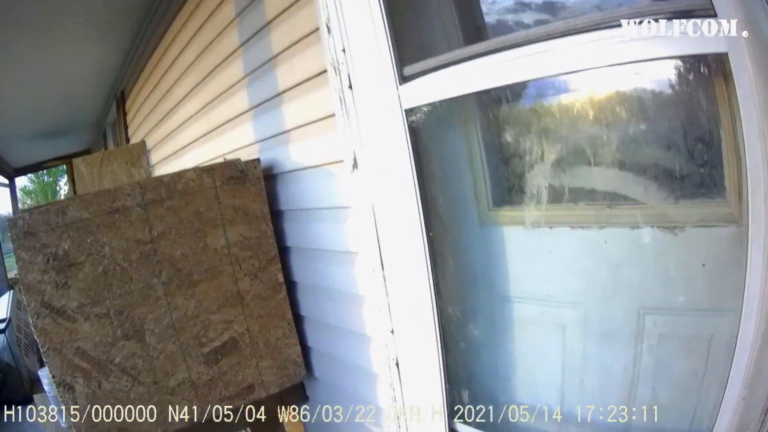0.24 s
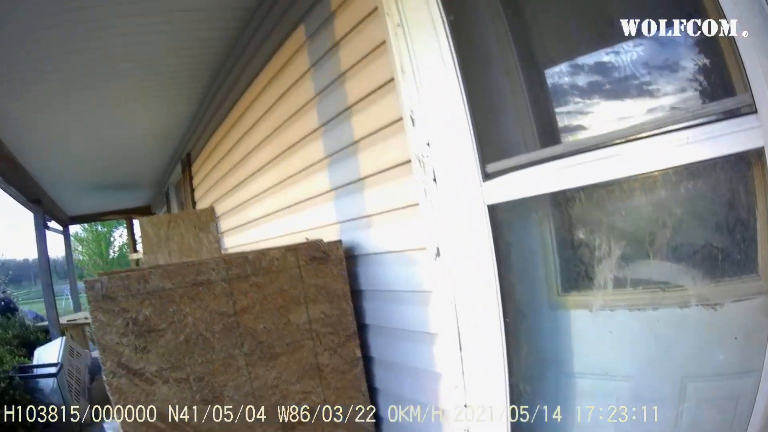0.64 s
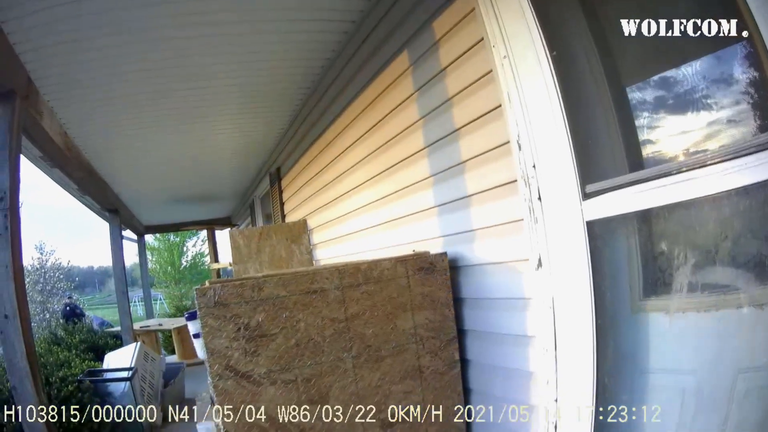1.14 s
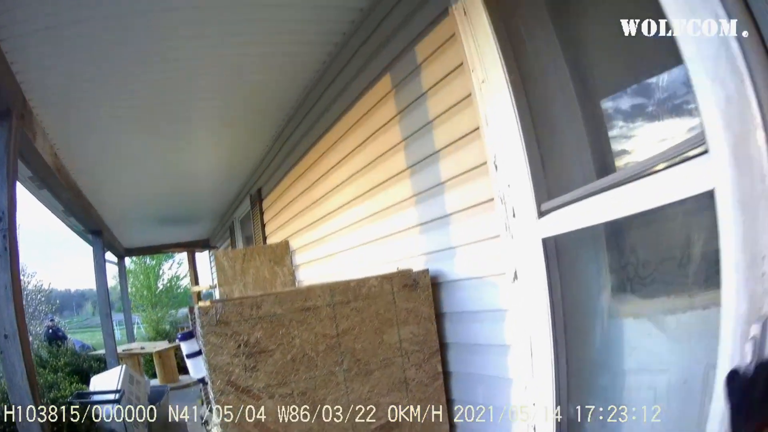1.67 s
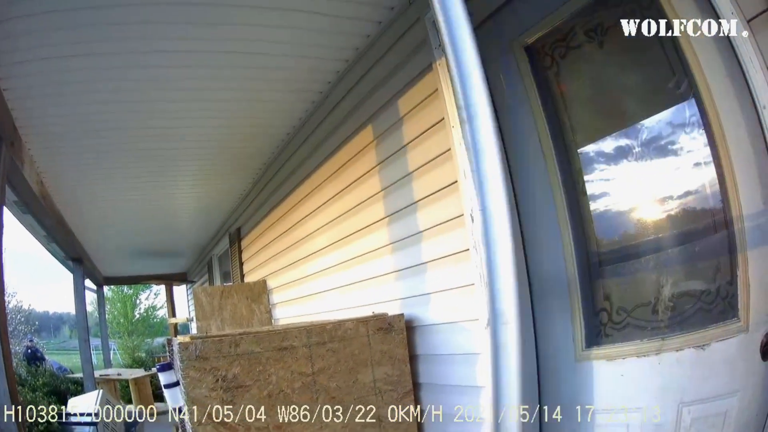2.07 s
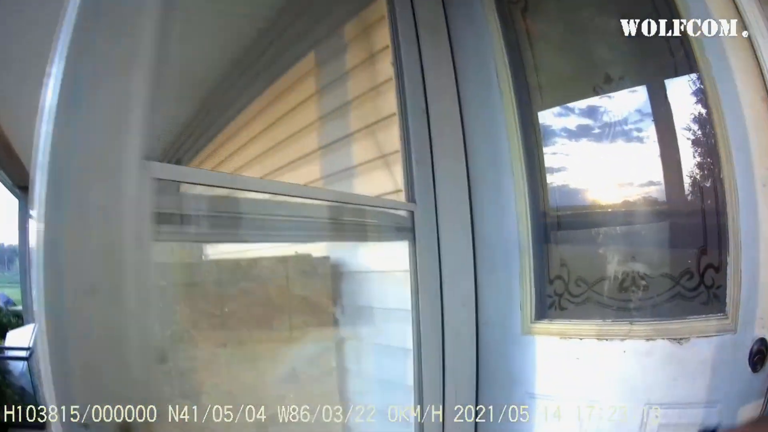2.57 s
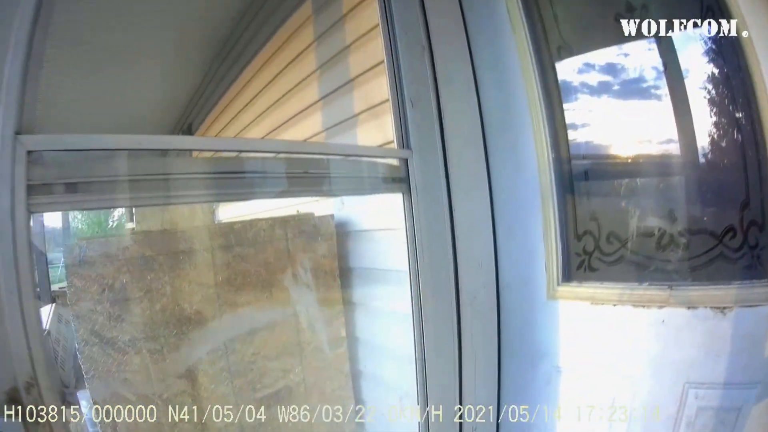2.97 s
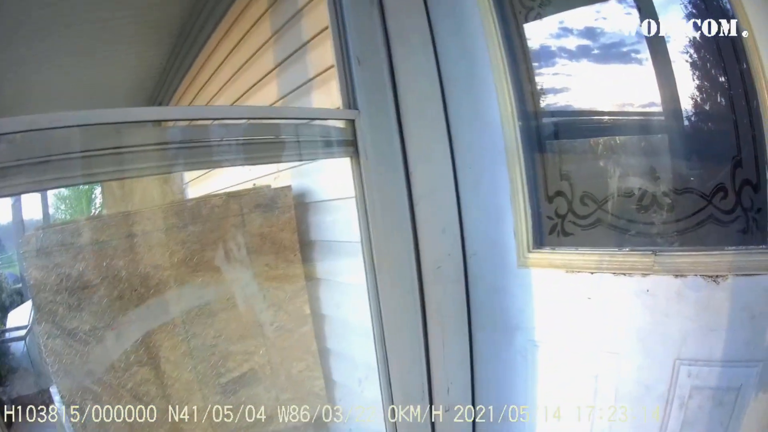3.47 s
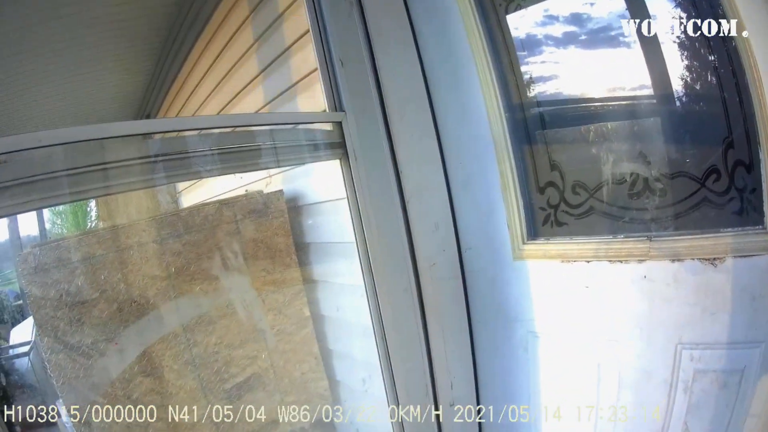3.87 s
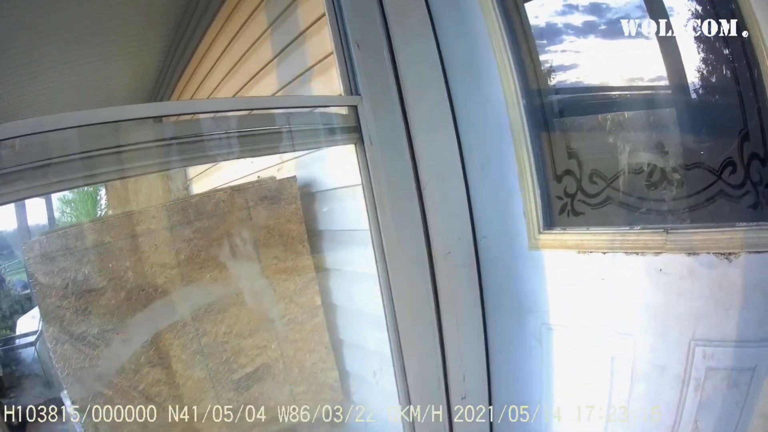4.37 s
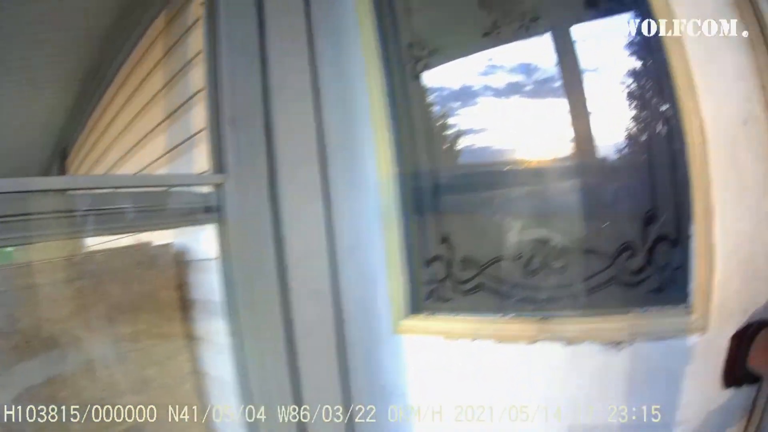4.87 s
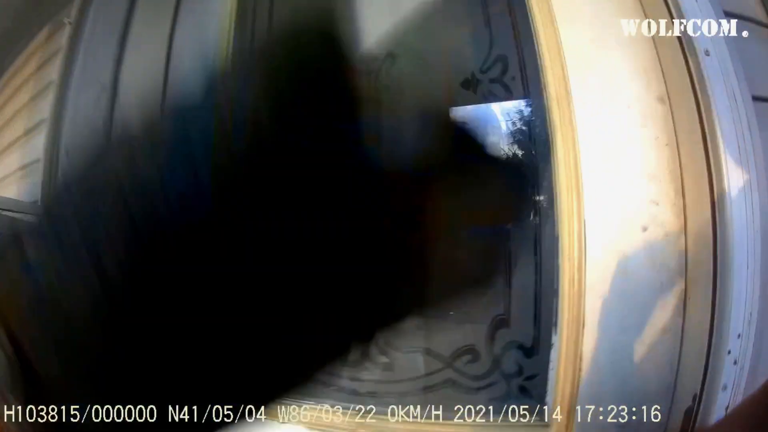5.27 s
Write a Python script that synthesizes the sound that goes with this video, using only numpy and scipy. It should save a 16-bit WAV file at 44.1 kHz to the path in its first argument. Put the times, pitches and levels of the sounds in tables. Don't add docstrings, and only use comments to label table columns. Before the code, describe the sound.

On a quiet covered porch, a hard sharp hit rings a thin door frame and loose glass, then dies within half a second. Sharp clicks, metal pings and sliding scrapes mark the latch and the door swinging open. It calms to faint contacts and soft outdoor wash, a bird chirping now and then, before low bumps and fabric rustle close the clip. The slightly clipped, thinned sound comes from a body-worn camera.

```python
import sys
import numpy as np
from scipy import signal
from scipy.fft import rfft, irfft, next_fast_len
from scipy.io import wavfile
from scipy.ndimage import uniform_filter1d, map_coordinates

SR = 44100
rng = np.random.default_rng(int(sys.argv[2]) if len(sys.argv) > 2 else 0)


def elevation(decibels):
    levels = np.asarray(decibels, float)
    return 10 ** (levels / 20)


def unload_wav(signal):
    wavfile.write(
        sys.argv[1],
        SR,
        np.round(np.clip(np.atleast_2d(signal).T, -1, 1) * 32767).astype(np.int16),
    )


N = 243873

# [f/Hz, density/dB per Hz]
HISS_SPECTRUM = [(1470, -54), (2500, -19.5), (4110, -6.5), (5280, -4.5), (6300, -1.5), (8040, -8),
                 (10100, -12.5), (11900, -17.5), (14100, -28), (15500, -40)]
# [f/Hz, density/dB per Hz]
SCRAPE_SPECTRUM = [(410, -22), (700, -8.5), (2110, -6.5), (2300, -10), (2860, -10), (3800, -13.5),
                   (4940, -33), (8360, -120)]
# [f/Hz, density/dB per Hz]
BODY_SPECTRUM = [(59, -33), (100, -2.5), (227, -2.5), (272, -2.5), (400, -4.5), (594, -6.5), (1000, -17.5),
                 (1300, -45), (2200, -120)]
# [t/s, level/dB]
BREEZE_LEVEL = [(0, 1.5), (2.5, -0.5), (2.7, -4), (3.7, -1.5), (4.1, 0), (5.53, -0.5)]


def unit(x):
    return x / np.sqrt(np.mean(x ** 2) + 1e-20)


def along(points, hz):
    f, v = np.transpose(points)
    return np.interp(np.log(hz + 1), np.log(f + 1), v)


def curves(rows):
    s, *cols = np.transpose(rows)
    return [np.interp(np.arange(N) / SR, s, c) for c in cols]


def wobble(rate_hz):
    knots = rng.standard_normal(int(N * rate_hz / SR) + 4)
    return map_coordinates(knots, [np.arange(N) * rate_hz / SR])


def filtered(x, response):
    m = next_fast_len(N + SR // 2)
    return irfft(rfft(x, m) * response(np.fft.rfftfreq(m, 1 / SR)), m)[..., :N]


def resonance(modes):
    def response(f):
        total = 0
        for k, (centre, width, db) in enumerate(modes):
            damping = 1j * f * width
            total = total + (-1) ** k * elevation(db) * damping / (centre * centre - f * f + damping + 1)
        return total
    return response


def rush(spectrum, grain_db, patchy_db=0.):
    rough = rng.standard_normal(N) * elevation(grain_db * wobble(350) + 0.41 * grain_db * wobble(45))
    z = signal.stft(rough, nperseg=512)[2]
    field = uniform_filter1d(rng.standard_normal(z.shape), size=3, axis=0)
    field = uniform_filter1d(field, size=5, axis=1)
    rough = signal.istft(z * elevation(patchy_db * unit(field)), nperseg=512)[1][:N]
    return unit(filtered(rough, lambda hz: elevation(along(spectrum, hz))))


def echoes(x, t60s, delay_s):
    hz, t, z = signal.stft(rng.standard_normal(SR // 2), SR, nperseg=256)
    tail = signal.istft(z * elevation(-60 * t / along(t60s, hz)[:, None]), SR, nperseg=256)[1]
    delayed = np.pad(x, (round(delay_s * SR), 0))
    return signal.fftconvolve(delayed, tail / np.linalg.norm(tail))[:N]


def surroundings():
    # [t/s, f/Hz, level/dB]
    hum_track = [
        (0, 638, -59),
        (2.6, 630, -62),
        (3.4, 562, -60.5),
        (5.53, 571.6, -62),
    ]
    # [f/Hz, density/dB per Hz]
    air_spectrum = [(59, -31), (100, -17.5), (404, -19), (468, -2), (629, -16.5), (761, -25.5), (1020, -8),
                    (2140, -16.5), (2290, -35), (3640, -46), (4220, -41), (5790, -16), (15600, -19)]
    # [t/s, level/dB]
    traffic_level = [(0, -24), (.06, -37.5), (.3, -51), (.71, -57), (.85, -49.5), (1.17, -55), (1.4, -51),
                     (1.66, -61), (1.8, -53.5), (2.45, -50.5), (2.55, -43), (2.66, -55), (3.1, -50.5),
                     (3.48, -53), (4.28, -46.5), (4.99, -44.5), (5.3, -48.5), (5.53, -44)]
    # [f/Hz, density/dB per Hz]
    rumble_spectrum = [(12, -33), (20, -20), (27, -8), (75, 0.5), (91, -1), (108, -16), (150, -10),
                       (200, -28.5), (330, -120)]
    hum_hz, hum_db = curves(hum_track)
    phase = 2 * np.pi * np.cumsum(hum_hz + 32 * wobble(150)) / SR
    hum = np.sqrt(2) * np.sin(phase) * elevation(hum_db + 2.5 * wobble(30))
    air = elevation(-62 + curves(BREEZE_LEVEL)[0]) * rush(air_spectrum, grain_db=0)
    traffic_db = curves(traffic_level)[0] + 1.2 * wobble(6.9)
    return air + elevation(traffic_db) * rush(rumble_spectrum, grain_db=2.0) + hum


def sparrow():
    # [t/s, time stretch, pitch factor, level/dB, second note's top f/Hz]
    chirp_rows = [
        (1.162, .95, .99, -34.5, 3980),
        (2.611, 1.0, .98, -38.5, 3950),
        (3.696, .92, 1.0, -35, 4000),
        (4.873, 1.0, .99, -42, 4500),
    ]
    # [lead-in/dB, arch top/dB, second note/dB, second note's pitch factor, falling end/dB]
    voicing = [
        (-20, -2, -4, 1.11, -1),
        (-20, 6, -4, 1.0, 5),
        (-3, -1, -6, 1.09, 5),
        (-4, 2, 7, 1.0, -6),
    ]
    # [t from start/s, f/Hz, level/dB]
    lead_in = [(-.035, 6100, -40), (-.025, 6050, -19), (-.008, 6000, -21), (-.005, 6000, -50)]
    # [t from start/s, f/Hz, level/dB]
    arch = [(-.003, 3800, -50), (.002, 4150, -2), (.007, 5200, -5), (.016, 5600, -5), (.022, 4600, -3),
            (.029, 3950, -2), (.035, 3700, -18)]
    # [t from start/s, f/Hz, level/dB]
    peaked = [(.046, 3300, -14), (.065, 3350, -17), (.082, 3650, -14), (.093, 4350, -2), (.097, 3800, -8),
              (.102, 3100, -7), (.112, 2900, -5), (.12, 2850, -14), (.127, 2800, -40)]
    # [delay/s, level/dB]
    perch_walls = [(.0031, -3), (.0078, -6), (.0133, -9), (.027, -12)]
    song = np.zeros(N)
    when, hz, db = np.transpose(lead_in + arch + peaked)
    quiver, flutter_db = 1 + 0.017 * wobble(500), 3.5 * wobble(350)
    lead, top, second = when < -.004, (hz > 5000) & (when > 0), when > .07
    peak = second & (hz > 3500)
    for chirp, voice in zip(chirp_rows, voicing):
        s, stretch, pitch, level_db, top_hz = chirp
        lead_db, top_db, second_db, lift, end_db = voice
        t = np.arange(N) / SR - s
        sung_hz = np.where(peak, np.minimum(hz * pitch * lift, top_hz), hz * pitch)
        sung_db = db + lead_db * lead + top_db * top + second_db * second + end_db * (when > .1)
        sung_db = sung_db + 60 * (lift - 1) * (peak & (hz < 4000))
        glide_hz = uniform_filter1d(np.interp(t, when * stretch, sung_hz), size=50) * quiver
        envelope_db = level_db + np.interp(t, when * stretch, sung_db, -120, -120) + flutter_db
        song += elevation(envelope_db) * np.sin(2 * np.pi * np.cumsum(glide_hz) / SR)
    return song + sum(elevation(db) * np.pad(song, (round(s * SR), 0))[:N] for s, db in perch_walls)


def strokes():
    # [peak t/s, rise/s, fall/s, hiss/dB, scrape rel/dB]
    stroke_rows = [(0.0, .05, 0.14, -21.5, 0), (.17, 0.096, 0.33, -43, -8), (.86, 0.33, 0.34, -36.5, -27),
                   (0.906, 0.16, 0.4, -30, -9), (1.2, 0.3, 0.42, -46.5, -3),
                   (1.311, 0.093, 0.061, -46.5, -2.5), (1.8, 0.3, 0.4, -51.5, 1.5),
                   (2.02, 0.43, 0.49, -42.5, -13), (2.4, 0.83, 0.92, -48, 0),
                   (2.66, 0.36, 0.26, -44.5, -26), (3.05, 0.22, 0.77, -45.5, -14.5),
                   (3.26, 0.26, 0.2, -40.5, -5), (3.35, 0.57, 0.5, -52, -44), (3.8, 0.27, 0.19, -45.5, -12),
                   (4.47, 0.23, 0.45, -50.5, -5), (4.79, 0.27, 1, -65, -1), (4.99, 1, 0.85, -50.5, -6),
                   (5.46, 0.37, 0.71, -36.5, -12)]
    s, rise, fall, db, scrape_db = np.transpose(stroke_rows)[:, :, None]
    t = np.arange(0, N, 64) / SR - s
    loss_db = 33 * np.where(t < 0, -t / np.abs(rise), t / np.abs(fall))
    shape = elevation(db - loss_db)

    def total(rel_db, rest_db):
        power = np.sum((shape * elevation(rel_db)) ** 2, axis=0) + elevation(rest_db) ** 2
        return np.repeat(10 * np.log10(power), 64)[:N]
    return total(0, -63), total(scrape_db, -67.5)


def cloth():
    hiss_db, scrape_db = strokes()
    body_db = -7.5 + curves(BREEZE_LEVEL)[0] + 0.74 * scrape_db
    shared_db = 1.0 * wobble(25)
    hiss = elevation(hiss_db + shared_db) * rush(HISS_SPECTRUM, grain_db=1.24, patchy_db=0.0)
    scrape = elevation(scrape_db + shared_db) * rush(SCRAPE_SPECTRUM, grain_db=0.7, patchy_db=2.5)
    return hiss + scrape + elevation(body_db + shared_db) * rush(BODY_SPECTRUM, grain_db=2.0)


def rubs():
    # [t/s, length/s, f/Hz, width/Hz, level/dB]
    rub_rows = [(0, .05, 310, 50, -32), (.98, 0.045, 720, 120, -35), (1.63, .12, 160, 32, -44.5),
                (2.931, 0.27, 1350, 260, -58), (2.98, 0.15, 2800, 150, -66), (3.0, 0.24, 5900, 270, -63),
                (3.2, 0.125, 790, 1000, -42), (4.107, .04, 340, 110, -46), (4.752, .06, 2100, 1800, -55),
                (5.247, 0.63, 128, 49, -45), (5.345, .15, 1250, 1500, -42), (5.29, .06, 6200, 500, -52),
                (5.425, .105, 6200, 780, -34)]
    t, out = np.arange(N) / SR, np.zeros(N)
    for s, length, hz, width, db in rub_rows:
        level = elevation(db + 2.5 * wobble(40))
        swell = np.sqrt(np.sin(np.pi * np.clip((t - s) / length, 0, 1)).clip(0))
        mode = resonance([(hz, width, 0)])
        out += level * swell * unit(filtered(rng.standard_normal(N), lambda f: mode(f) ** 2))
    return out


def decaying_tones(rows, attack_s):
    out, t = np.zeros(N + SR), np.arange(SR // 4) / SR
    for s, hz, db, t60 in rows:
        envelope = elevation(db - 60 * t / t60) * (1 - np.exp(-t / attack_s))
        out[round(s * SR):][:len(t)] += envelope * np.sin(2 * np.pi * hz * t)
    return out[:N]


def panel_thumps():
    # [t/s, f/Hz, peak/dB, t60/s]
    thump_rows = [(.001, 316.5, -13.5, 0.084), (.012, 163, -23, 0.22), (.022, 623, -21.5, 0.086),
                  (.004, 59.4, -19, 0.19), (.03, 115, -24, 0.11), (.06, 178, -25, .1), (.34, 50, -37, 0.21),
                  (.475, 150, -36, 0.16), (.742, 345, -34, 0.19), (.752, 167, -37, 0.21),
                  (.745, 628, -41.5, 0.18), (.831, 166, -29, 0.071), (0.834, 332, -32, .1),
                  (.848, 150, -37.5, 0.13), (.875, 304, -35, .2), (.905, 300, -32, 0.22),
                  (0.907, 433, -40, 0.09), (.985, 189, -30, 0.21), (1.655, 802, -37.5, 0.34),
                  (1.66, 645, -36, 0.27), (1.682, 368, -36.5, 0.21), (1.976, 240, -34.5, 0.093),
                  (1.86, 161, -37, 0.16), (2.043, 190, -32, 0.093), (2.185, 280, -36, .06),
                  (2.2, 563, -39, .08), (2.33, 900, -37, .06), (2.24, 522, -36.5, .3),
                  (2.285, 391, -30.5, .15), (2.288, 546, -35, 0.17), (2.37, 236, -31, 0.082),
                  (2.38, 415, -21.5, 0.045), (2.417, 420, -31, 0.14), (2.42, 863, -29, 0.06),
                  (2.47, 522, -29.5, 0.06), (2.565, 130, -37, 0.11), (3.229, 189, -31, 0.055),
                  (3.258, 162, -29, 0.071), (3.275, 930, -33.5, 0.097), (4.109, 403, -27.5, 0.079),
                  (4.111, 108, -28.5, 0.072), (4.13, 261, -34, .15), (4.216, 186, -31, 0.054),
                  (4.604, 980, -43.5, 0.071), (5.277, 444, -30.5, 0.037), (5.314, 134, -28.5, 0.098),
                  (5.452, 745, -26, 0.051), (5.475, 139, -19.5, 0.055), (5.517, 152, -25, .1)]
    return decaying_tones(thump_rows, attack_s=0.0024)


def metal_pings():
    # [t/s, f/Hz, peak/dB, t60/s]
    ping_rows = [(.0135, 8360, -4.5, 0.018), (.0245, 7470, -8, 0.016), (.6595, 5730, -27.5, 0.034),
                 (.665, 2530, -33.5, 0.065), (.754, 6250, -28, 0.033), (1.149, 6010, -30, .04),
                 (1.152, 2770, -28, 0.025), (1.9855, 4360, -29, 0.023), (1.9775, 1320, -37, 0.018),
                 (2.0868, 6430, -21.5, 0.0095), (2.1145, 1500, -29, 0.014), (2.1835, 1590, -39, 0.02),
                 (2.185, 4580, -37, .03), (2.3292, 4260, -22, .015), (2.3755, 4100, -29, 0.024),
                 (2.4153, 3700, -37, .03), (2.436, 6800, -33, 0.011), (2.457, 4060, -32.5, 0.036),
                 (2.497, 4240, -37, 0.019), (4.7545, 1610, -38, 0.018), (4.77, 3250, -49, .06),
                 (4.771, 1730, -43.5, 0.063), (5.172, 1000, -44.5, .03)]
    return decaying_tones(ping_rows, attack_s=0.00024)


def rattle(hiss, scrape, body):
    bright = hiss[:N] * rush(HISS_SPECTRUM, grain_db=2.5, patchy_db=3.5)
    middle = scrape[:N] * rush(SCRAPE_SPECTRUM, grain_db=1.24, patchy_db=2.5)
    return bright + middle + elevation(-2) * body[:N] * rush(BODY_SPECTRUM, grain_db=2.0, patchy_db=3.0)


def slides():
    # [t/s, peak/dB, scrape rel/dB, thud rel/dB, t60/s]
    slide_rows = [(0.079, -21, -30, -23, 0.076), (0.091, -4.5, -42, -20, 0.059),
                  (0.662, -26, -0.5, 0.5, 0.29), (0.738, -20, 1.5, 3, 0.16), (0.829, -19.5, -7, 2.5, 0.22),
                  (0.898, -17.5, 2.5, -2, 0.086), (1.1217, -21, -34, -13, 0.33),
                  (1.18, -33.5, 8.5, -23, 0.085), (1.6182, -20.5, -5.5, -6.5, 0.15),
                  (1.636, -16.5, -6.5, -17, 0.16), (1.6548, -8.5, -15, -21, 0.11),
                  (1.667, -17.5, -6, -3, 0.1), (1.7, -24.5, -1, 3, 0.18), (1.733, -18.5, 1, -14, 0.073),
                  (1.8538, -14.5, -5, -22.5, 0.14), (1.978, -20.5, -2.5, -7, 0.085),
                  (1.996, -24, -4.5, -2, 0.13), (2.041, -32, 9.5, 10.5, 0.1), (2.197, -26, -5, -5, 0.37),
                  (2.226, -25.5, -12, -4, 0.27), (2.246, -22, -6, -5, 0.15), (2.272, -27, 2, 0, 0.24),
                  (2.2907, -35.5, 6.5, 9, 0.17), (2.335, -35.5, 0, 0, 0.085), (2.38, -42, 6, 8, 0.13),
                  (2.42, -37, 8, 3, 0.067), (2.455, -28, 3.5, 10, 0.1), (3.24, -25, -12, -0.5, 0.33),
                  (3.83, -35, -7, -13, 0.35), (4.4134, -39, -1, -5, 0.1), (4.2375, -37.5, -7, 11, 0.17),
                  (4.5755, -38, -14, 9, 0.26), (5.33, -40, -9, 4, 0.85), (5.394, -29.5, -3, 6.5, 0.24),
                  (5.444, -27.5, -1, -2, 0.12)]
    t = np.arange(SR // 2) / SR
    hiss, scrape, body = np.zeros((3, N + SR))
    for s, db, scrape_db, thud_db, t60 in slide_rows:
        at = slice(round(s * SR), round(s * SR) + len(t))
        swell = (1 - np.exp(-t / (0.038 * t60))) ** 2
        fade = elevation(db - 10.5 - 60 * t / t60) * swell
        hiss[at] += fade
        scrape[at] += elevation(scrape_db) * fade
        body[at] += elevation(thud_db) * fade
    return rattle(hiss, scrape, body)


def contacts():
    # [t/s, peak/dB, thud rel/dB]
    pane_rows = [(0.0004, 2, -19.5), (0.0054, -12.5, -19), (0.0132, -5, -17), (0.016, -0.5, -22),
                 (0.0232, -12.5, -23), (0.057, -10.5, -20), (0.1205, -21, -10), (0.124, -17, -27),
                 (0.138, -22, -26), (0.142, -22.5, -24), (0.2428, -26, -19), (0.247, -30, -20),
                 (0.27, -35, -23), (0.272, -36, -23), (0.298, -46, -20), (0.327, -36.5, -20),
                 (0.33, -33, -15), (0.3614, -36, -16), (0.3655, -41, -17), (0.421, -35.5, -31),
                 (0.426, -36.5, -30), (0.464, -37.5, -1), (1.317, -28.5, -8.5), (2.8307, -39, -31),
                 (3.795, -49, -9), (3.8329, -26, -10), (3.8335, -34, -17.5), (4.073, -47.5, 14),
                 (4.432, -39, 0), (5.0944, -38.5, -17)]
    # [t/s, peak/dB, scrape rel/dB, thud rel/dB]
    latch_rows = [(0.2043, -33, 4.5, -4), (0.213, -42.5, 8, -8), (0.347, -46, 10, 11), (0.39, -52, 11, -4),
                  (0.66, -20.5, -6.5, -22), (0.7405, -30, 5, -7), (0.982, -8, -4.5, -20),
                  (1.0386, -21.5, -2, -37), (1.1487, -20, -2.5, -11), (1.266, -31.5, 3, -3),
                  (1.304, -28.5, -9, -16), (2.087, -20, -4, -14), (2.1149, -33.5, 8.5, 8),
                  (2.1826, -34, 7, 9.5), (2.264, -7.5, -6.5, -22.5), (2.3295, -25, 1.5, -10),
                  (2.3744, -29, 7.5, -6), (2.4152, -36, 8, 9.5), (2.4483, -32.5, 7.5, -3),
                  (2.4963, -42, 14.5, 9), (2.5461, -10, -7.5, -18.5), (2.6002, -40.5, 12, -10),
                  (3.51, -40, -2.5, -18), (3.558, -51.5, 7, -11), (3.829, -27.5, 4, -13),
                  (4.1106, -24.5, -5, 1), (4.605, -30.5, -6, -17), (4.7524, -39.5, 3.5, -3),
                  (5.002, -43, 6, -15), (5.191, -41, 4, -15), (5.2573, -40, 3, 4), (5.3522, -37, 1, 3)]
    rows = [(s, db, -25.5, thud_db, 0.069, 235.4) for s, db, thud_db in pane_rows]
    rows += [(*row, 0.074, 323) for row in latch_rows]
    places = rng.standard_normal(len(rows))
    return [(*row[:-1], row[-1] * np.exp(0.403 * place)) for row, place in zip(rows, places)]


def knocks():
    # [f/Hz, level/dB, t60/s]
    frame_modes = [(2220, -32, 5.0), (3980, -18, 0.14), (4810, -2, 0.12), (4580, 12.5, 0.082),
                   (5850, 8, 0.095), (5980, 5, 0.42), (6840, 7.5, 0.13), (8560, -3, 0.06), (8660, -8, 0.11),
                   (7970, -5.5, 0.082)]
    # [f/Hz, width/Hz, level/dB]
    crack_modes = [(1920, 1400, -13), (4850, 1580, -12.5), (6250, 3000, -3), (9930, 1580, -5)]
    t = np.arange(SR // 4) / SR
    hiss, scrape, body, ring, blow, clack = np.zeros((6, N + SR))
    for s, db, scrape_db, thud_db, t60, panel_hz in contacts():
        at = slice(round(s * SR), round(s * SR) + len(t))
        fade = elevation(db - 14.5 - 60 * t / t60) * (1 - np.exp(-t / 0.00049))
        fade = fade * (1 + 1.28 * elevation(-60 * t / 0.016))
        hiss[at] += fade
        scrape[at] += elevation(scrape_db) * fade
        body[at] += elevation(thud_db + db - 16.0 - 60 * t / (4.54 * t60))
        chance = rng.standard_normal((len(frame_modes), 2))
        for (hz, level, life), (a, b) in zip(frame_modes, chance):
            mode_db = db - 27.0 + level + 3.1 * a - 60 * t / min(life, 0.34 * t60)
            ring[at] += elevation(mode_db) * np.sin(2 * np.pi * hz * (1 + 0.022 * b) * t)
        thump_db = db + thud_db
        ring[at] += elevation(thump_db - 8 - 60 * t / 0.07) * np.sin(2 * np.pi * panel_hz * t)
        ring[at] += elevation(thump_db - 14 - 60 * t / 0.076) * np.sin(2 * np.pi * 0.63 * panel_hz * t)
        blow[at.start] += elevation(db + 17.5)
        clack[at.start] += elevation(db + 15.0 + 0.51 * scrape_db)
    crack = filtered(blow[:N], resonance(crack_modes[1:]))
    return rattle(hiss, scrape, body) + ring[:N] + crack - filtered(clack[:N], resonance(crack_modes[:1]))


def scene():
    # [f/Hz, t60/s]
    porch_t60 = [(150, 0.096), (1500, 0.19), (5000, 0.19), (12000, 0.13)]
    # [f/Hz, t60/s]
    yard_t60 = [(2000, 0.081), (6000, 0.16)]
    hard, bird = knocks(), sparrow()
    ceiling = elevation(-7) * np.pad(hard, (round(.0058 * SR), 0))[:N]
    metal = hard + ceiling + slides() + panel_thumps() + metal_pings()
    near = metal + elevation(-12.0) * echoes(metal, porch_t60, delay_s=0.0098)
    far = elevation(1.5) * bird + elevation(-4) * echoes(bird, yard_t60, delay_s=0.0021)
    return (near + far + rubs() + cloth() + surroundings())[None]


def thin_blocks(x):
    # [centre t/s, threshold over nearby lines/dB]
    starved = [(.095, 3), (.18, -2), (.671, 0), (.692, 0), (.714, 7), (.756, 4), (.863, 6), (.948, 5),
               (1.034, -3), (1.098, 2), (1.204, 0), (1.396, 5), (1.674, 2), (2.015, 1), (2.058, 6),
               (2.143, 5), (2.463, 4), (2.634, -2), (2.975, 5), (3.06, 2), (3.231, 0), (3.338, 4),
               (3.722, 8), (3.743, 5), (4.852, 5), (4.895, -5)]
    # [from t/s, to t/s, top f/Hz]
    narrow = [
        (1.625, 1.77, 13600),
        (1.97, 2.07, 13200),
        (2.554, 2.6, 14000),
    ]
    startled = [.221, .413, .636, .96, 1.597, 1.853, 2.077, 2.24, 2.268, 2.525, 3.677, 4.093, 4.957]
    t, hop, lead = np.arange(N) / SR, 941, 513
    window = np.sin(np.pi * (np.arange(2 * hop) + .5) / (2 * hop))
    hz, s, lines = signal.stft(np.pad(x, (lead, 0)), SR, window, nperseg=2 * hop)
    over_db = np.full(len(s), -9.0)
    for centre, db in starved:
        over_db[np.argmin(np.abs(s - lead / SR - centre))] = db
    size, coarse = np.abs(lines), (hz > 680)[:, None]
    nearby = np.sqrt(np.abs(uniform_filter1d(coarse * size ** 2, size=60, axis=0)))
    overall = np.sqrt(np.mean(size[(hz > 900) & (hz < 12000)] ** 2, axis=0))
    band_draws = rng.standard_normal((len(hz) // 12 + 1, len(s)))
    band_db = 3.7 * np.repeat(band_draws, 12, axis=0)[:len(hz)]
    treble_db = 6.2 * np.clip(hz / 4000 - 2.5, 0, 1)[:, None]
    step = nearby ** 0.71 * overall ** 0.35 * elevation(over_db + band_db + treble_db)
    kept = lines * (size > step * coarse)
    thinned = signal.istft(kept, SR, window, nperseg=2 * hop)[1][lead:lead + N]
    out = thinned.copy()
    spans = narrow + [(start, start + .028, 8700) for start in startled]
    for top_hz in {row[2] for row in spans}:
        gate = sum((t > start) & (t < end) for start, end, top in spans if top == top_hz).clip(0, 1)
        out -= uniform_filter1d(1.0 * gate, size=130) * filtered(thinned, lambda f: f > top_hz)
    return out


def band_limit(x):
    return signal.sosfilt(signal.butter(12, 15680, fs=SR, output="sos"), x)


def record(dry):
    held = dry / (1 + np.abs(dry) ** 8) ** (1 / 8)
    limited = filtered(held[0], lambda hz: hz < 15680)
    mix = thin_blocks(limited)[None]
    return band_limit(mix)


dry = scene()
out = record(dry)
unload_wav(out)
```